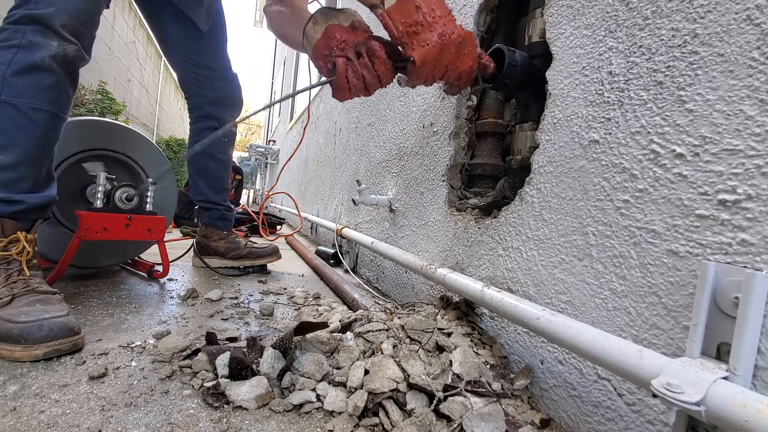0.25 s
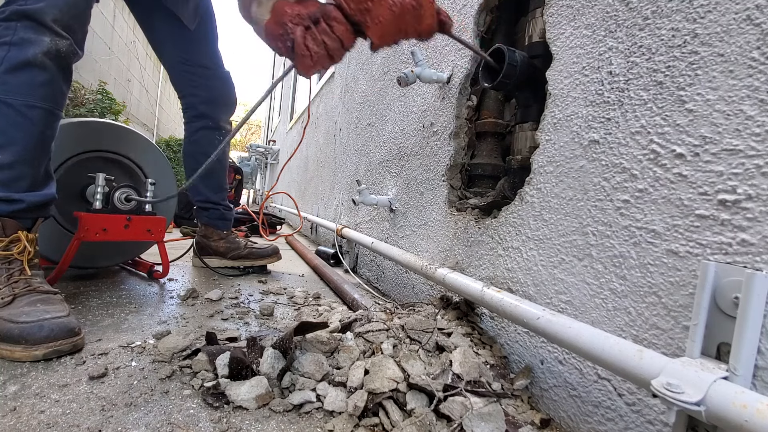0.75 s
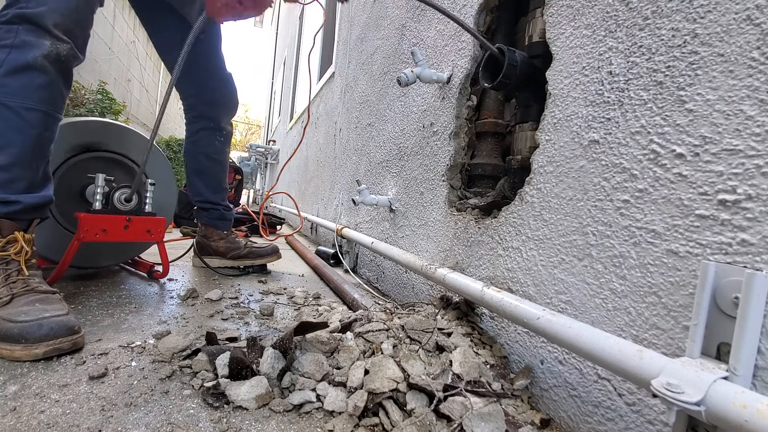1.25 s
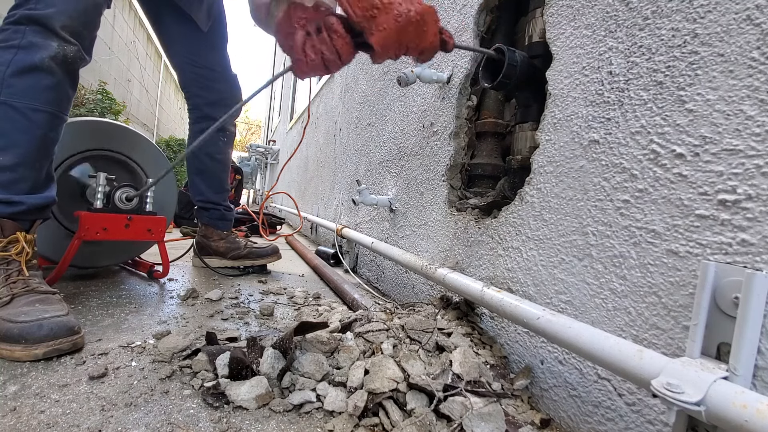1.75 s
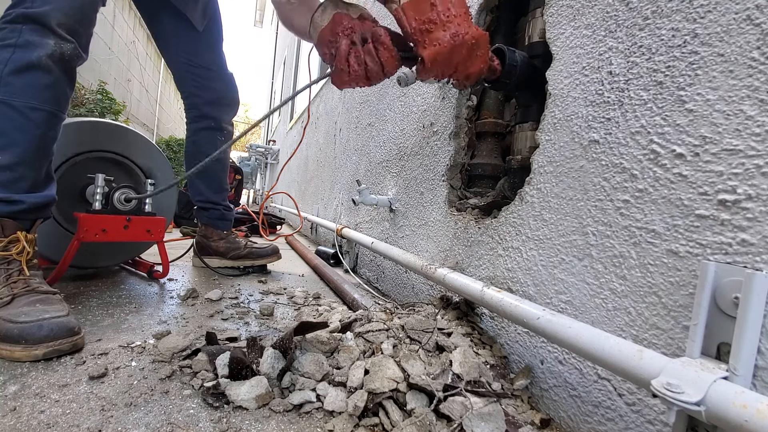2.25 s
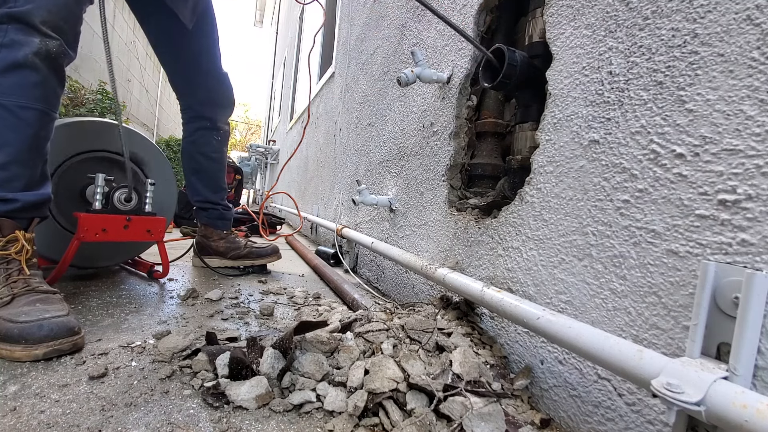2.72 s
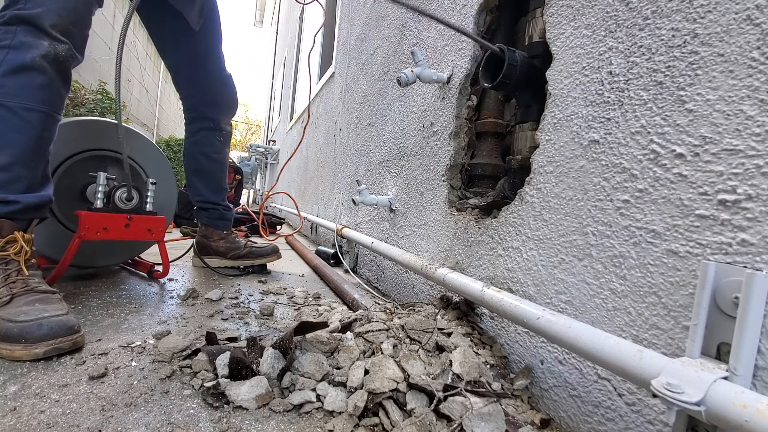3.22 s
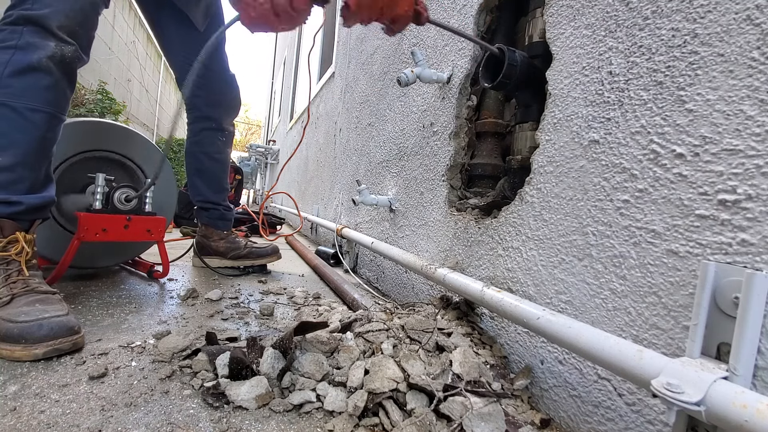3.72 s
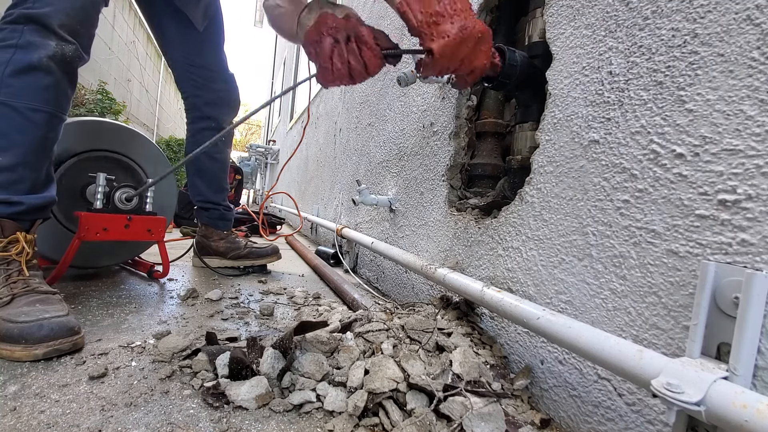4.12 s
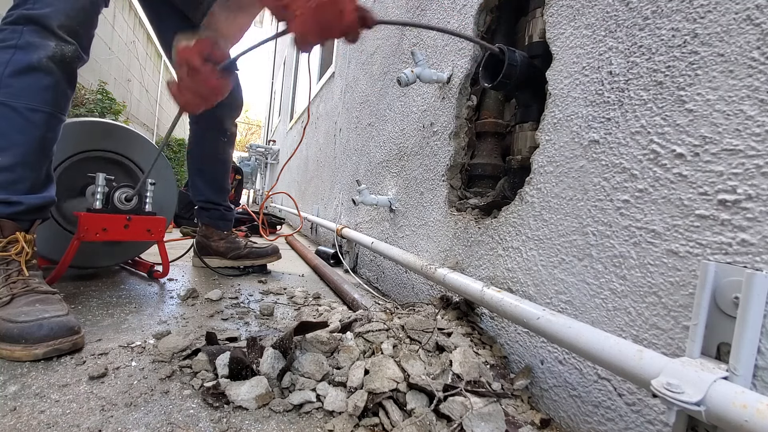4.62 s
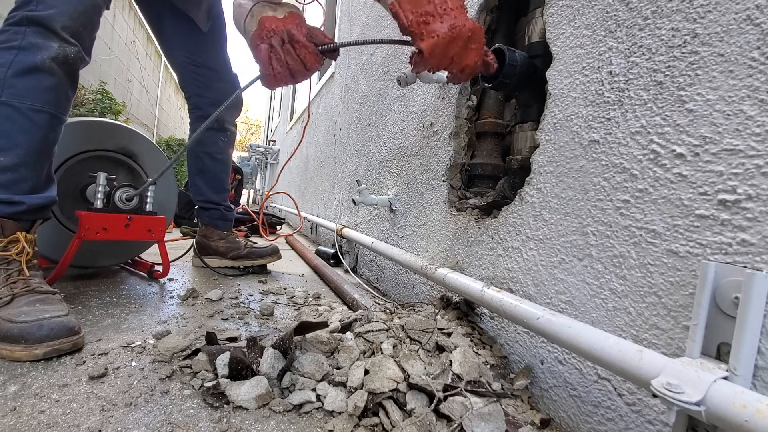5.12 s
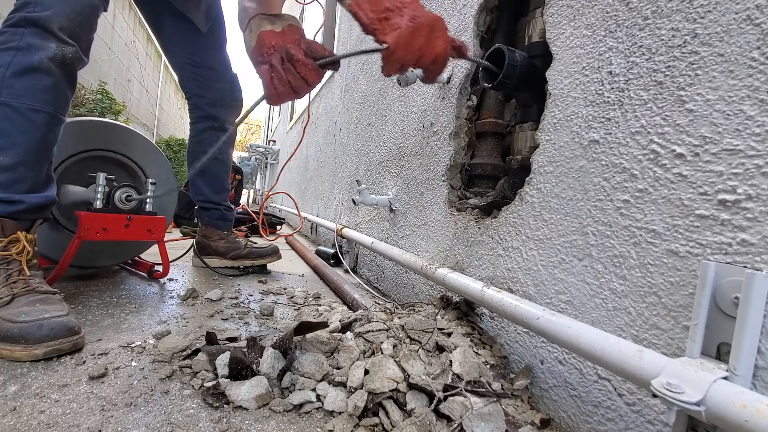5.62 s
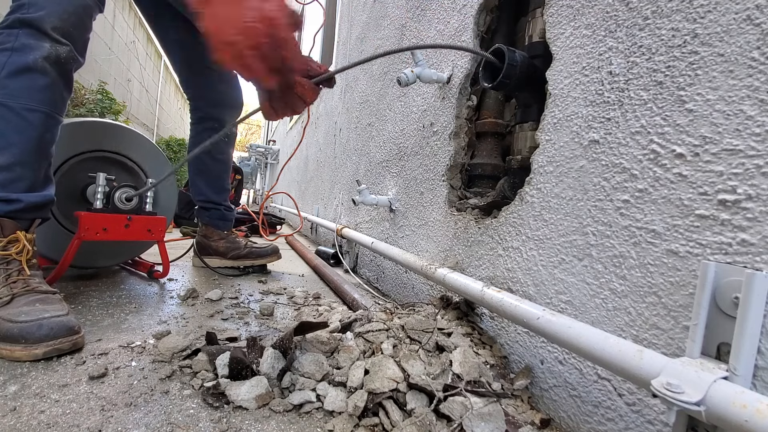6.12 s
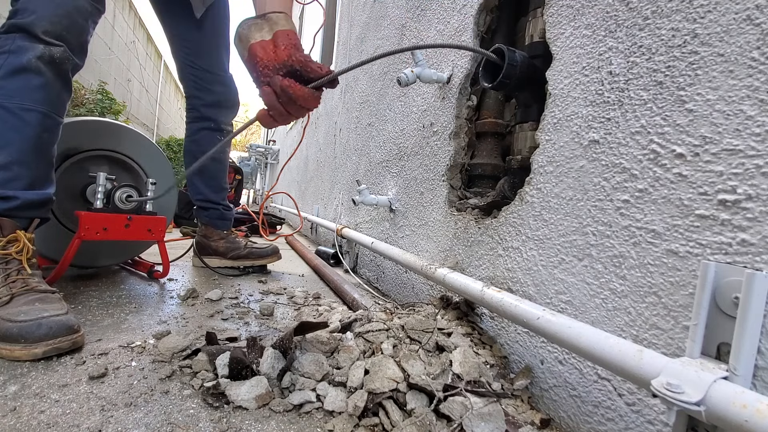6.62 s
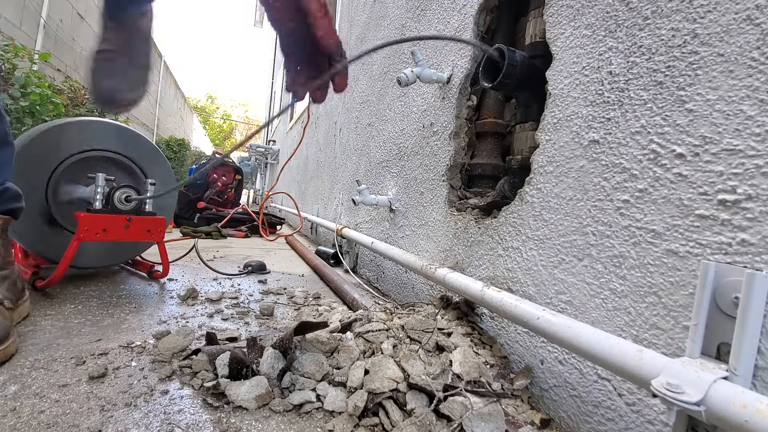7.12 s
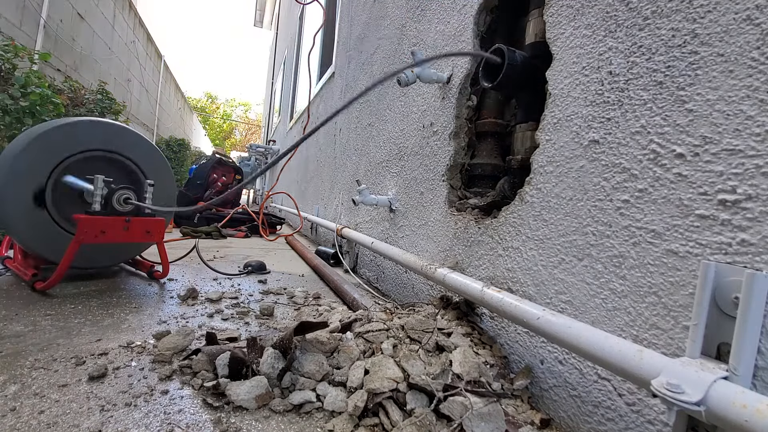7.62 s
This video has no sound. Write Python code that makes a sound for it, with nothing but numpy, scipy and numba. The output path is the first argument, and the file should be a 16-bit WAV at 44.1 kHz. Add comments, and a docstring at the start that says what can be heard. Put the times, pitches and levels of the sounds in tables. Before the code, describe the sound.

A drum drain-cleaning machine hums and rumbles outdoors while its steel cable knocks, ticks and zips in and out of a pipe.

```python
"""A drum drain-cleaning machine runs in a narrow concrete passage between a house wall and a fence.
The motor hums, the drum rumbles, and the cable scours the pipe, knocks in the drum and ticks on the guide.
Gloved hands haul it back, so its windings zip over the lip of the pipe, and feed it in with a squawk,
twice over. More cable grinds out through the guide. Near the end the slack cable slaps the guide,
boots scuff over grit and the hum sags under load."""
import sys
import numpy as np
from scipy import signal
from scipy.fft import rfft, irfft, next_fast_len
from scipy.io import wavfile
from numba import njit

SR = 44100
rng = np.random.default_rng(int(sys.argv[2]) if len(sys.argv) > 2 else 0)


def output_pcm(signal):
    """Save a mono or channel-first signal as 16-bit PCM at the path in sys.argv[1].

    Samples are clipped to [-1, 1] before scaling.
    """
    pcm = np.clip(np.atleast_2d(signal).T, -1, 1) * 32767
    wavfile.write(sys.argv[1], SR, np.round(pcm).astype(np.int16))


N = 346273
T = np.arange(N) / SR


def undb(db):
    """Decibels to gain."""
    return 10 ** (np.asarray(db) / 20)


def unit(x):
    """Scale to rms 1."""
    return x / np.sqrt(np.mean(x ** 2) + 1e-18)


def curve(table):
    """Automation: straight lines through (time_s, value) points."""
    return np.interp(T, *np.transpose(table))


def stroke(start, attack, hold, release, db):
    """Envelope of one stroke: it rises, holds and dies away."""
    rise = np.clip((T - start) / max(attack, 1e-3), 0, 1)
    fall = np.clip(1 - (T - start - attack - hold) / max(release, 1e-3), 0, 1)
    return undb(db) * rise * fall


def strokes(table):
    """Envelope of a series of strokes, silent between them."""
    return sum(stroke(*row[:5]) for row in table)


def add(track, start_s, sound):
    """Mix a sound into a track."""
    i = max(int(start_s * SR), 0)
    track[..., i:i + sound.shape[-1]] += sound[..., :N - i]


def wander(rate_hz):
    """Smooth random drift with a spread near 1."""
    points = rng.standard_normal(4096)
    return 1.2 * np.interp(T * rate_hz, np.arange(len(points)), points)


def stereo_noise(likeness):
    """White noise, from wide (likeness 0) to mono (1)."""
    mid, side = rng.standard_normal((2, N))
    return np.sqrt((1 + likeness) / 2) * mid + np.sqrt((1 - likeness) / 2) * side * np.array([[1], [-1]])


def grains(rate_hz, spread_db, likeness):
    """Random tiny impacts of uneven size, each from its own direction."""
    size = undb(spread_db * np.minimum(rng.exponential(size=N), 3))
    hits = rng.random(N) < rate_hz / SR
    return unit(hits * size * stereo_noise(likeness))


def chatter(rise_s, t60_s):
    """A contact that buzzes briefly: a noise burst with peak 1."""
    t = T[:SR // 10]
    burst = rng.standard_normal(len(t)) * np.minimum(t / rise_s, 1) * undb(-60 * t / t60_s)
    return burst / np.abs(burst).max()


def colour(x, eq, size=4096):
    """Minimum-phase EQ of unit energy through (freq_hz, gain_db) points, rolling off past the ends."""
    hz, db = np.transpose(eq)
    log_hz = np.log(np.maximum(np.fft.rfftfreq(size, 1 / SR), 1))
    skirt_db = 24 * (np.maximum(np.log(hz[0]) - log_hz, 0) + np.maximum(log_hz - np.log(hz[-1]), 0))
    cepstrum = irfft(np.log(undb(np.interp(log_hz, np.log(hz), db) - skirt_db)))
    cepstrum[1:size // 2] *= 2
    cepstrum[size // 2:] = 0
    response = irfft(np.exp(rfft(cepstrum)))
    response /= np.linalg.norm(response)
    return signal.fftconvolve(np.atleast_2d(x), response[None], axes=1)[:, :x.shape[-1]]


def resonate(x, hz, width_hz):
    """One resonance with gain 1 at its centre."""
    return signal.lfilter(*signal.iirpeak(hz, hz / width_hz, fs=SR), x)


def steady_ring(x, hz, width_hz):
    """A resonance with steep skirts, at rms 1."""
    return unit(resonate(resonate(x, hz, width_hz), hz, width_hz))


@njit
def sweep(x, hz, width_hz):
    """One resonance whose centre may move, with gain 1 there."""
    y, band, low = np.empty(len(x)), 0., 0.
    for i in range(len(x)):
        g, damping = np.tan(np.pi * hz[i] / SR), width_hz / hz[i]
        v = (band + g * (x[i] - low)) / (1 + g * (g + damping))
        band, low, y[i] = 2 * v - band, low + 2 * g * v, damping * v
    return y


def moving_ring(x, hz, width_hz):
    """A moving resonance with steep skirts, at rms 1."""
    return unit(sweep(sweep(x, hz, float(width_hz)), hz, float(width_hz)))


def passage(x, left_db, echo_db, left_lag_s=.00012):
    """Panned direct sound, quick echoes off wall and ground, and a dull tail down the passage."""
    t = T[:SR // 2]
    near_t60_s, far_t60_s = .016, .11
    near, far = rng.standard_normal((2, 2, len(t)))
    near = near * undb(-60 * t / near_t60_s) * (t > .001)
    far = signal.lfilter([1], [1, -.5], far) * undb(-60 * t / far_t60_s)
    response = undb(echo_db) * (unit(near) + undb(-9) * unit(far)) / np.sqrt(len(t))
    response[0, int(max(left_lag_s, 0) * SR)] += 1
    response[1, int(max(-left_lag_s, 0) * SR)] += 1
    response /= np.linalg.norm(response, axis=1, keepdims=True)
    pan = undb(np.array([[left_db], [-left_db]]) / 2)
    return signal.fftconvolve(np.atleast_2d(x), response, axes=1)[:, :N] * pan


# fader ride on the hum: time_s, level_db
HUM_LEVELS = [(.7, -34), (1.22, -29.5), (1.5, -37), (2.7, -39.5), (3.5, -33.5), (3.74, -22), (4.05, -48),
              (4.75, -35), (5.2, -38), (5.6, -29.5), (6.7, -34.5), (7.2, -24.5), (7.6, -23), (7.85, -42.5)]
# how hard the motor works: time_s, load (0-1)
MOTOR_LOAD = [(6.7, 0), (6.95, 0.52), (7.2, 0.54), (7.37, 0.29), (7.6, 0.91), (7.85, 0.7)]


def motor(idle_hz=119.5, sag_hz=21.82):
    """The hum wavers; its octave grows as the load drags the pitch down."""
    load = curve(MOTOR_LOAD)
    pitch_hz = (idle_hz - sag_hz * load) * (1 + .03 * wander(30))
    phase = 2 * np.pi * np.cumsum(pitch_hz) / SR
    hum = np.sin(phase) + undb(-10 + 6.1 * load) * np.sin(2 * phase)
    level_db = curve(HUM_LEVELS) - 4.5 + 5.05 * wander(20)
    return passage(unit(hum) * undb(level_db), left_db=-1.1, echo_db=-45)


# fader rides on the drum's rumble and the coil's rattle: time_s, level_db
RUMBLE_LEVELS = [(0.3, -32.5), (0.75, -29.5), (1.3, -34.5), (2.05, -30.5), (2.6, -37), (3.45, -33),
                 (3.75, -30.5), (5.3, -36), (5.7, -29.5)]
RATTLE_LEVELS = [(0.0, -34.5), (0.61, -38), (0.83, -33), (1.44, -39), (1.94, -33.5), (2.45, -40.5),
                 (4.5, -36), (4.68, -27), (4.96, -39), (7.04, -39), (7.43, -31.5), (7.85, -41.5)]
# deep rumble, boxy rattle: freq_hz, gain_db
RUMBLE_EQ = [(20, -1.5), (55, -0.5), (100, 1), (170, -6.5), (300, -20)]
RATTLE_EQ = [(90, -19), (150, -8.5), (300, 5), (390, -8), (445, -5), (535, -5.5), (640, -11.5),
             (1600, -32.5)]


def drum(turn):
    """The spinning drum drones on its frame while the coil tumbles inside it."""
    drone = steady_ring(stereo_noise(.9), hz=69, width_hz=14)
    roll = unit(colour(stereo_noise(1), RUMBLE_EQ))
    rumble = (undb(-.5) * drone + undb(-1) * roll) * undb(curve(RUMBLE_LEVELS) - .5 + .29 * turn)
    tumble = grains(rate_hz=420, spread_db=1.8, likeness=.7) * undb(2 * turn)
    rattle = unit(colour(tumble, RATTLE_EQ)) * undb(curve(RATTLE_LEVELS) + 5)
    return rumble + passage(rattle, left_db=-.68, echo_db=-5, left_lag_s=-.00024)


# fader ride on the cable spinning in the pipe: time_s, level_db
SCRAPE_LEVELS = [(1.8, -44), (2.93, -50.5), (4.1, -42.5), (5.1, -48.5), (5.7, -40), (7.1, -41),
                 (7.85, -37.5)]
# dull scrape, and the hard clack of stray ticks and later slaps: freq_hz, gain_db
SCRAPE_EQ = [(500, 0), (900, -3), (2600, -15), (8000, -30), (15500, -32)]
CLACK_EQ = [(300, -14), (1000, 2), (1450, -5), (2100, 0), (3000, -9), (3700, 1), (4600, -8), (8000, -11),
            (16000, -18)]


def pipe_scrape(turn):
    """The cable scours the pipe, a little harder once a turn, and ticks against it at random."""
    grit = grains(rate_hz=4000, spread_db=2.2, likeness=.5) + stereo_noise(.3)
    pressure = undb(1.3 * turn + 1.7 * wander(45))
    scrape = unit(colour(grit * pressure, SCRAPE_EQ))
    hits = grains(rate_hz=12, spread_db=.64, likeness=.26)
    contacts = signal.fftconvolve(hits, chatter(rise_s=.00055, t60_s=.051)[None], axes=1)[:, :N]
    stray_ticks = undb(-16) * unit(colour(contacts, CLACK_EQ))
    out = (scrape + stray_ticks) * undb(curve(SCRAPE_LEVELS) + 2)
    return passage(out, left_db=-1.5, echo_db=-9, left_lag_s=0)


# the coil knocks on the drum wall: start_s, level_db, pitch_hz
COIL_KNOCKS = [(.064, -27, 540), (.27, -27, 333), (0.41, -23, 533), (1.09, -24.5, 300), (1.73, -22, 520),
               (1.828, -17, 317), (1.93, -19.5, 277.3), (2.238, -25.5, 530), (2.539, -11, 270),
               (2.739, -19, 245), (3.876, -18.5, 295), (4.045, -21.5, 335), (4.433, -17, 285),
               (4.552, -13.5, 572), (4.575, -17.5, 523), (4.666, -10, 322), (5.209, -22, 537),
               (5.587, -21, 297), (6.28, -23, 330), (7.522, -22.5, 460)]
# muffled thud: freq_hz, gain_db
THUD_EQ = [(120, -5.5), (280, -3), (600, -12.5), (2000, -40.5)]


def knocks(rise_s=.002, t60_s=.08):
    """Loops of cable drop against the drum: soft, hollow thuds."""
    out, t = np.zeros((1, N)), T[:SR // 10]
    envelope = np.minimum(t / rise_s, 1) * undb(-60 * t / t60_s)
    for start_s, level_db, pitch_hz in COIL_KNOCKS:
        tone = np.sin(2 * np.pi * pitch_hz * t) * envelope
        thud = colour(chatter(rise_s=.0036, t60_s=.029), THUD_EQ)
        add(out, start_s, undb(level_db) * (1.07 * tone + 1.18 * thud))
    return passage(out, left_db=-.28, echo_db=-11, left_lag_s=-.00037)


# flicks on the guide, in runs about a drum turn apart: start_s, level_db
GUIDE_TICKS = [(0.084, -34), (.1967, -35), (0.318, -33.5), (1.1288, -32), (1.3573, -37), (1.4755, -31.5),
               (1.796, -30), (2.2606, -29), (3.312, -22), (3.4297, -28), (3.537, -23.5), (3.6492, -24),
               (3.763, -23.5), (3.98, -28.5), (4.0914, -24.5), (4.2028, -27.5), (4.9673, -33.5),
               (5.0842, -29), (5.201, -30.5), (6.1095, -22.5), (6.2195, -21), (6.3346, -25)]
# thin, bright click: freq_hz, gain_db
TICK_EQ = [(1500, -5), (4400, -5), (5500, 5.5), (6600, -6), (10000, -5.5), (12400, -2.5), (16000, -5)]


def ticks(top_scatter_db=9.5):
    """The kinked cable flicks the guide as it comes round, each time a little differently."""
    out = np.zeros((2, N))
    for start_s, level_db in GUIDE_TICKS:
        top_db = top_scatter_db * rng.standard_normal()
        detune = np.exp(.02 * rng.standard_normal())
        eq = [(hz * detune, db + top_db * (hz > 9000)) for hz, db in TICK_EQ]
        add(out, start_s, undb(level_db + 10) * colour(chatter(rise_s=.0016, t60_s=.0092), eq))
    return passage(out, left_db=.058, echo_db=11)


def windings(rate_hz, jitter, uneven_db, grit, grit_share):
    """Each winding snaps over the edge and then scrapes; a fast cable runs more evenly than a slow one."""
    wobble_hz = jitter * 89.9 * wander(170)  # just as wide at any speed
    phase = np.cumsum(np.maximum(rate_hz + wobble_hz, 1)) / SR
    count = phase.astype(int)
    size = undb(uneven_db * np.clip(rng.standard_normal(4096), -2, 2))[count]
    snaps = np.diff(count, prepend=0) * np.sqrt(SR / rate_hz)
    scrape = np.exp(-(phase % 1) / grit_share) * stereo_noise(.87)
    return unit(size * snaps), grit * unit(size * scrape)


def disperse(x, delay_s):
    """A coiled cable carries treble faster than bass, so each snap is drawn out into a tiny chirp."""
    size = next_fast_len(N + SR // 10)
    lateness_s = delay_s / np.sqrt(1 + np.fft.rfftfreq(size, 1 / SR) / 1000)
    phase = 2 * np.pi * np.cumsum(lateness_s) * SR / size
    return irfft(rfft(x, size) * np.exp(-1j * phase), size)[:N]


# hauls out of the pipe: start_s, attack_s, hold_s, release_s, level_db, treble_db, boom_db
HAUL_STROKES = [(0.643, .055, 0.044, 0.095, -26, -1, -2.5), (0.76, 0.071, 0.19, 0.041, -22, 1.5, -1.5),
                (2.427, 0.015, 0.28, 0.057, -20, 2, -2)]
# cable speed, one list for each pull: time_s, windings_hz
PULL_SPEEDS = [
    [(.65, 70), (.71, 112), (.76, 78), (.81, 108), (.862, 171), (.91, 170), (.925, 149), (1.01, 160),
     (1.05, 132)],
    [(2.43, 75), (2.48, 118), (2.52, 228), (2.56, 318), (2.612, 384), (2.63, 374), (2.655, 310),
     (2.688, 284), (2.706, 305), (2.735, 272), (2.78, 190)],
]
# steel cable ringing on the lip of the pipe: pitch_hz, width_hz, level_db
LIP_RESONANCES = [(783, 98, 3), (888, 155, -2.5), (1066, 200, -8), (1629, 286, -9.5), (1918, 240, -9),
                  (2110, 260, -4.5), (2288, 520, -6.5), (3643, 480, -6), (3902, 320, -3), (4460, 980, -11),
                  (6130, 820, -10), (7300, 1100, -18.5)]
# boom of the shaken pipe and drum: freq_hz, gain_db
BOOM_EQ = [(70, 0), (110, 13.5), (260, 5), (420, 10.5), (650, -2.5), (1300, -38)]


def hauls(treble_from_hz=1400, boom_fade_db_per_s=25):
    """Windings zip over the lip of the pipe and ring the steel; each tug starts a boom that fades."""
    speed_hz = curve([point for pull in PULL_SPEEDS for point in pull])
    snaps, scrape = windings(speed_hz, jitter=.035, uneven_db=2, grit=.36, grit_share=.6)
    snaps = disperse(snaps, delay_s=.007)
    grit = colour(scrape, [(200, -11), (900, -10), (2000, -6.5), (4000, 0), (16000, 1)])[0]
    force = snaps + undb(9) * grit
    body = steel = out = 0
    for k, (pitch_hz, width_hz, level_db) in enumerate(LIP_RESONANCES):
        gain = (-1) ** k * undb(level_db + 2 * wander(70))  # neighbouring modes swing opposite ways
        mode = gain * moving_ring(force, pitch_hz * (1 + .018 * wander(14)), width_hz)
        if pitch_hz < treble_from_hz:
            body += mode
        else:
            steel += mode
    hiss = unit(colour(scrape, [(7000, -4), (8500, 6.5), (12000, 8), (16000, -9)]))
    boom = unit(colour(snaps + .6 * scrape, BOOM_EQ)) * undb(2 * wander(50))
    effort = undb(np.log2(speed_hz / 155))  # 1 dB louder for each doubling of speed
    for start_s, *shape, treble_db, boom_db in HAUL_STROKES:
        tug = undb(boom_db - boom_fade_db_per_s * np.maximum(T - start_s, 0))
        rasp = undb(-6.5) * body + undb(treble_db) * (undb(-3) * steel + undb(-10.5) * hiss)
        out += stroke(start_s, *shape) * effort * (rasp + tug * boom)
    return passage(out, left_db=-2, echo_db=-6, left_lag_s=.00015)


# slow feeds into the pipe: start_s, attack_s, hold_s, release_s, level_db, windings_hz
FEED_STROKES = [(1.162, 0.0041, 0.084, 0.22, -41, 52.8), (1.497, 0.21, 0.13, 0.036, -37.5, 80.37),
                (2.842, 0.017, 0.0094, 0.01, -31.5, 139.8), (2.973, 0.0033, 0.033, 0.034, -30, 154.8),
                (3.054, 0.0023, 0.13, 0.25, -38, 65.8), (3.433, 0.052, 0.45, 0.068, -38, 75.48)]
# midrange rasp: freq_hz, gain_db
FEED_EQ = [(500, -14), (950, -1), (1800, -9.5), (3050, -20), (3600, -13), (4100, -13), (4700, -18),
           (7500, -21), (10000, -29), (16000, -34)]


def feeds():
    """Windings bump over the lip of the pipe, each feed at its own pace, and thrum back along the cable."""
    start_s, *_, windings_hz = np.transpose(FEED_STROKES)
    current_feed = np.maximum(np.searchsorted(start_s, T) - 1, 0)
    speed_hz = windings_hz[current_feed]
    snaps, scrape = windings(speed_hz, jitter=.36, uneven_db=1.5, grit=2.8, grit_share=.59)
    thrum = undb(-.5) * steady_ring(snaps, hz=173, width_hz=105)
    rasp = undb(4) * unit(colour(snaps + scrape, FEED_EQ))
    return passage((rasp + thrum) * strokes(FEED_STROKES), left_db=-2.1, echo_db=-.63)


# the pushed cable sticks: start_s, attack_s, hold_s, release_s, level_db, first_hz, last_hz
SQUAWK_STROKES = [(1.162, 0.0031, 0.02, .008, -36, 1348, 1120), (1.222, .008, 0.044, 0.089, -40, 1290, 950),
                  (2.856, .008, 0.0082, .01, -32, 1110, 1070), (2.967, .005, 0.023, .016, -36, 1130, 969)]


def squawks(slips_hz=166):
    """Quick stick-slip pulses sound a resonance that sinks as the cable goes in."""
    snaps, scrape = windings(slips_hz, jitter=.11, uneven_db=4, grit=.26, grit_share=.43)
    out = 0
    for start, attack, hold, release, level_db, first_hz, last_hz in SQUAWK_STROKES:
        glide_hz = np.interp(T, [start, start + attack + hold + release], [first_hz, last_hz])
        squawk = moving_ring(snaps + scrape[0], glide_hz, width_hz=290)
        out += squawk * stroke(start, attack, hold, release, level_db)
    return passage(out, left_db=-2.5, echo_db=-11.5)


# drags through the gloves: start_s, attack_s, hold_s, release_s, level_db
RUB_STROKES = [(1.885, 0.019, 0.014, 0.053, -35.5), (4.325, 0.032, .004, 0.069, -38),
               (4.41, 0.011, .004, 0.09, -36), (4.545, 0.0023, 0.056, 0.044, -39.5),
               (4.598, 0.036, 0.018, 0.085, -29), (4.68, 0.072, 0.02, 0.12, -31.5)]
# broad, warm friction: freq_hz, gain_db
RUB_EQ = [(150, -29), (330, 5.5), (800, 3), (2000, -2.5), (3000, -6.5), (5500, -6.5), (8000, -10.5),
          (16000, -14)]


def glove_rubs():
    """The cable slides through stiff rubber gloves in dense little slips."""
    slips = grains(rate_hz=5000, spread_db=4.9, likeness=.47) * undb(2 * wander(90))
    rub = undb(9) * unit(colour(slips, RUB_EQ))
    return passage(rub * strokes(RUB_STROKES), left_db=-.64, echo_db=1.1)


# cable paid out through the guide: start_s, attack_s, hold_s, release_s, level_db
GRIND_STROKES = [(4.535, 0.0055, 0.015, 0.038, -31.5), (4.602, 0.032, 0.019, 0.026, -21.5)]
# sizzle with one sharp metallic peak: freq_hz, gain_db
GRIND_EQ = [(3000, -2), (5100, -6), (5450, 10), (5850, -6), (14000, -2)]


def grinds():
    """Steel drags hard on steel: a bright surge with the ring of the guide in it."""
    slips = grains(rate_hz=6000, spread_db=3.1, likeness=.45) * undb(1.5 * wander(200))
    grind = unit(colour(slips, GRIND_EQ))
    return passage(grind * strokes(GRIND_STROKES), left_db=-.5, echo_db=-2, left_lag_s=0)


# hard hits on the guide: start_s, level_db, clink_db
GUIDE_SLAPS = [(5.953, -25, -9), (7.5464, -7, -11), (7.5723, -18.5, -10), (7.589, -22.5, -20),
               (7.668, -5.5, -22), (7.773, -18, 5), (7.788, -28, 4)]


def slaps():
    """The slack cable slaps the guide, which answers with a clink."""
    out = np.zeros(N)
    for start_s, level_db, clink_db in GUIDE_SLAPS:
        contact = undb(level_db + 1) * chatter(rise_s=.002, t60_s=.026)
        clink = undb(clink_db + 7.5) * resonate(contact, hz=2230, width_hz=330)
        add(out, start_s, colour(contact, CLACK_EQ)[0] + clink)
    return passage(out, left_db=-.52, echo_db=0)


# boots on gritty concrete: start_s, attack_s, hold_s, release_s, scuff_db, crunch_db
BOOT_STROKES = [(6.681, .003, 0.028, 0.043, -28, -41), (6.705, .02, 0.013, 0.065, -29, -27),
                (6.817, .003, .003, 0.022, -33, -44), (6.924, 0.011, .005, 0.024, -31, -47),
                (7.338, .005, 0.042, 0.15, -35, -41.5), (7.719, .005, .05, .02, -39.5, -42)]
# sandy scuff, crisp crunch: freq_hz, gain_db
SCUFF_EQ = [(900, 2.5), (2200, 7), (5500, 5.5), (8000, -0.5), (13500, -8), (16000, -11)]
CRUNCH_EQ = [(3000, -11), (6000, -5), (13500, 4)]


def boot_scuffs():
    """A sole scrapes the concrete and grit crunches under it."""
    grit = grains(rate_hz=4000, spread_db=5.8, likeness=.13) * undb(1.9 * wander(150))
    scuff = undb(-.5) * unit(colour(grit, SCUFF_EQ)) * strokes(BOOT_STROKES)
    cracks = grains(rate_hz=2600, spread_db=8.6, likeness=.18)
    crunch_strokes = [(*timing, crunch_db) for *timing, _, crunch_db in BOOT_STROKES]
    crunch = unit(colour(cracks, CRUNCH_EQ)) * strokes(crunch_strokes)
    return passage(scuff + crunch, left_db=.28, echo_db=-4)


def scene():
    """The full mix; the drum's turning sways the rumble, the rattle and the scrape."""
    turn_hz = 8.9 * (1 + .022 * wander(1.75))
    turn = np.sin(2 * np.pi * np.cumsum(turn_hz) / SR)
    machine = motor() + drum(turn) + pipe_scrape(turn) + knocks() + ticks()
    return machine + hauls() + feeds() + squawks() + glove_rubs() + grinds() + slaps() + boot_scuffs()


def record(dry):
    """Each side gets its own treble colour, then a steep low-pass cuts the very top."""
    left, right = dry
    left = left - .45 * resonate(left, hz=5420, width_hz=4000)
    presence = .13 * resonate(right, hz=3540, width_hz=740)
    sheen = .044 * resonate(right, hz=7100, width_hz=4200)
    right = right + presence + sheen - .23 * resonate(right, hz=9700, width_hz=2600)
    top_hz = 16100
    return signal.sosfilt(signal.ellip(10, .2, 80, top_hz, fs=SR, output="sos"), [left, right])


dry = scene()
out = record(dry)
output_pcm(out)
```